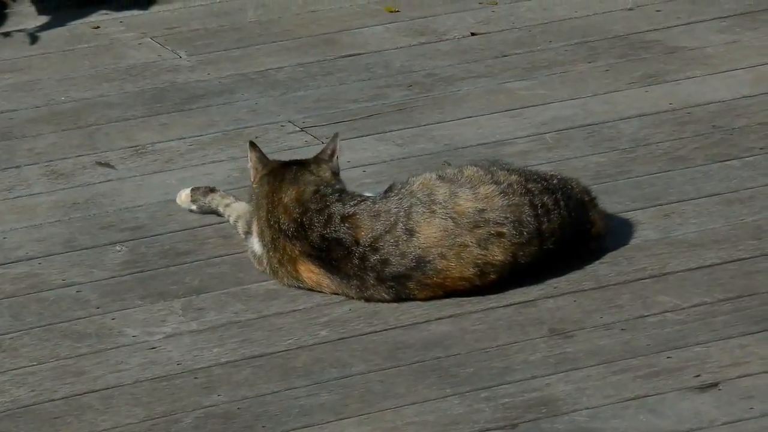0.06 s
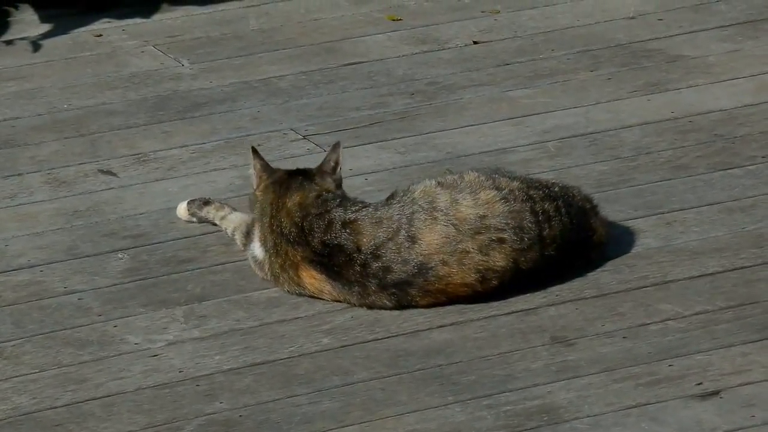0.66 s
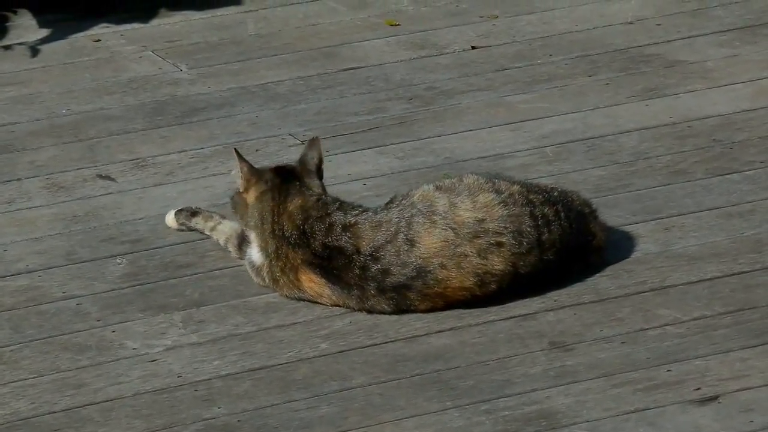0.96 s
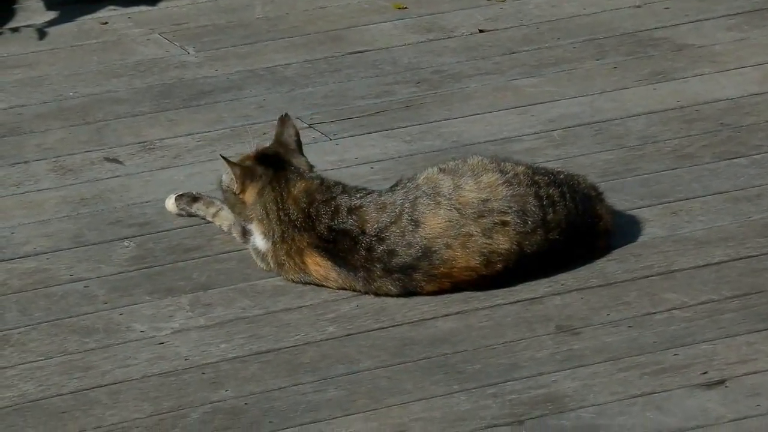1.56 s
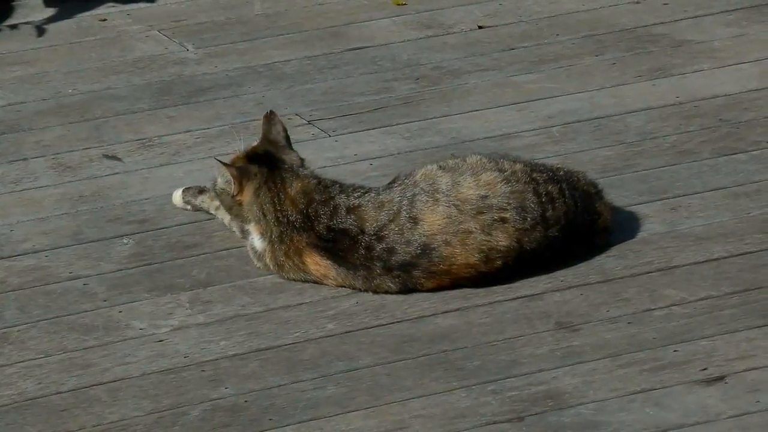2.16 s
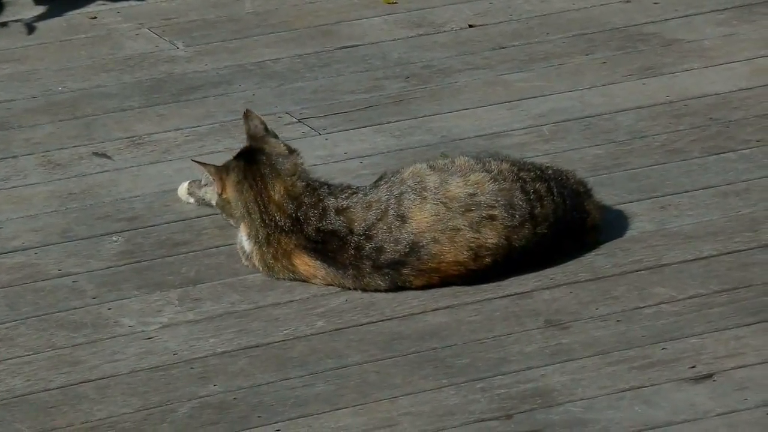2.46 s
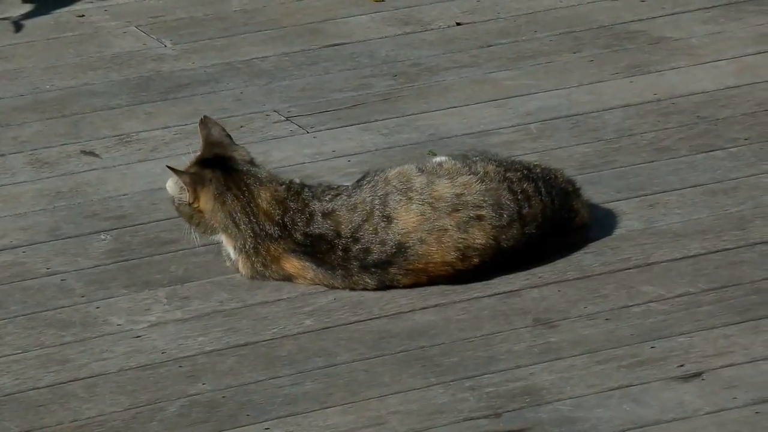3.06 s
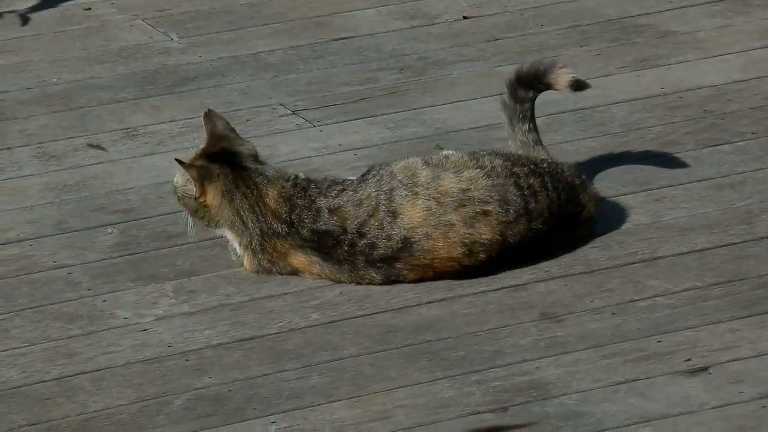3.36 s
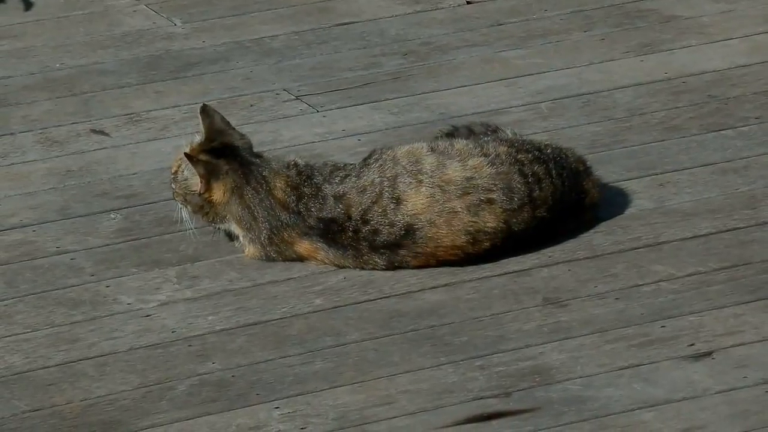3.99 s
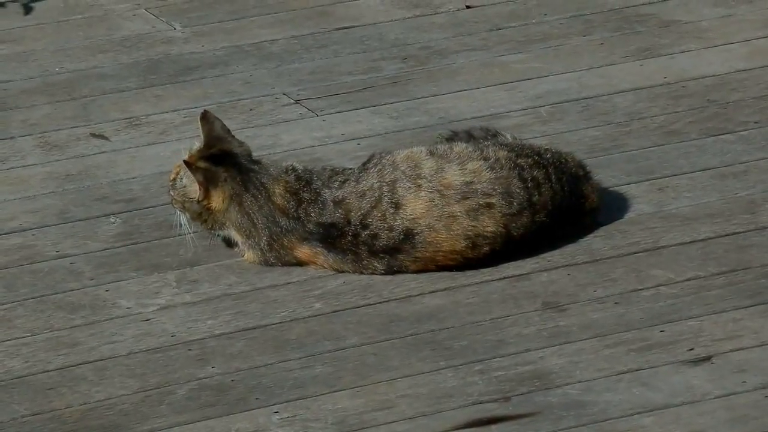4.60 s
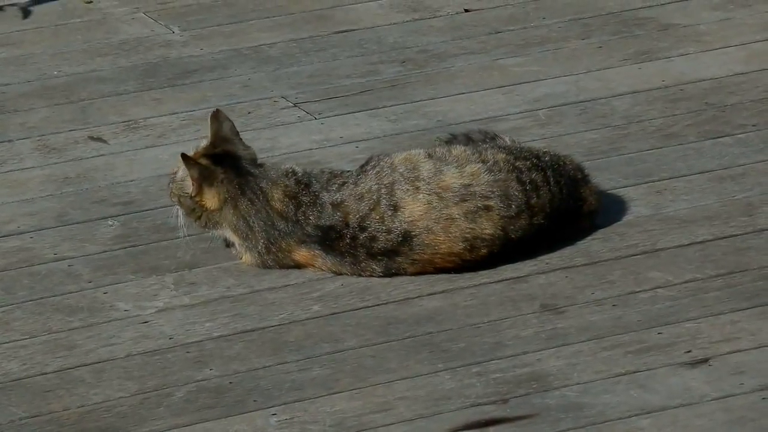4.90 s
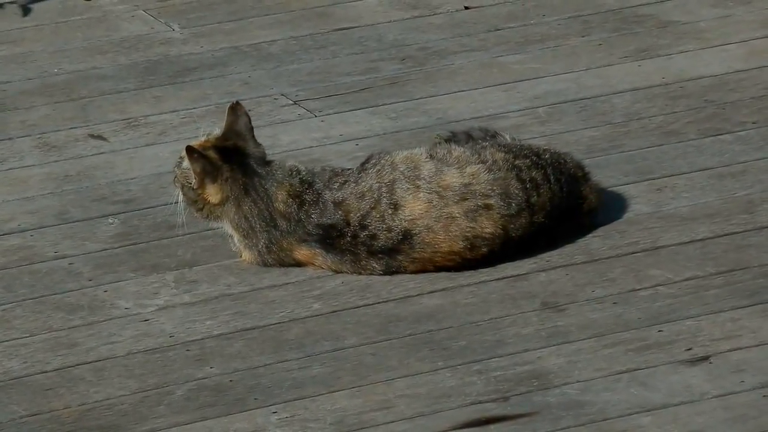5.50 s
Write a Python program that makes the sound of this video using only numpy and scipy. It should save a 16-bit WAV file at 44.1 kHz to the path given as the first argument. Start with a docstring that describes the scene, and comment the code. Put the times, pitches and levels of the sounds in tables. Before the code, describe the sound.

Sandals tap and thud irregularly on wooden boards outdoors, with faint bird chirps and a steady low rumble behind.

```python
"""Sandals on a wooden deck

A few uneven steps: the soles scuff and slap, grit clicks, each impact sets the boards and joists
ringing, and house walls reflect the slaps. To the left a small bird repeats a falling, warbled chirp;
others whistle faintly far away, their calls scattered by trees. Behind it all lie a low distant
rumble, a machine's hum and the microphone's hiss."""
import sys
import numpy as np
from scipy import signal
from scipy.fft import rfft, irfft, next_fast_len
from scipy.io import wavfile
from scipy.ndimage import map_coordinates

SR = 44100
rng = np.random.default_rng(int(sys.argv[2]) if len(sys.argv) > 2 else 0)


def materialize(psi):
    """Save the field psi as 16-bit PCM at rate SR to the path in sys.argv[1].

    A 1-D psi becomes a single channel; in a 2-D psi each row is a channel.
    """
    bounded = np.clip(np.atleast_2d(psi).T, -1, 1)
    quanta = np.round(bounded * 32767).astype(np.int16)
    wavfile.write(sys.argv[1], SR, quanta)


N = 244297

# Spectral densities of the noises: frequency_hz, relative_db
RUMBLE_SPECTRUM = [(12, -10), (20, -4), (43, -2.5), (90, -4), (112, -15), (173, -7.5), (293, -17.5),
                   (332, -18.5), (427, -23.5), (474, -23), (561, -29), (721, -30.5), (967, -39),
                   (2480, -52), (3000, -59.5), (3900, -72), (6600, -120)]
HISS_SPECTRUM = [(1000, -29), (2500, -30), (3800, -18), (5200, -11.5), (7000, -4.5), (9000, -2),
                 (12000, 1.5), (16000, 0.5)]
GRIT_SPECTRUM = [(1000, -17), (3500, -7), (6000, 8), (8000, 16.5), (10500, 5), (15000, -8)]
JOIST_SPECTRUM = [(70, -6.5), (130, 0.5), (190, -1), (330, -3.5), (600, -33.5), (1500, -45)]
SCUFF_SPECTRUM = [(500, -8), (2000, -5), (3200, -10), (6500, 0), (9000, -4), (15000, -16)]
SLAP_SPECTRUM = [(150, -58), (600, 3), (1200, -4), (1700, -3), (2300, -2), (3200, -9), (4600, -5),
                 (5600, -2.5), (7200, 3.5), (8800, -1.5), (11000, -8.5), (13000, -16), (16000, -25)]
# Likeness of the rumble in the two channels: frequency_hz, correlation
RUMBLE_CORRELATION = [(60, 0.98), (130, 0.97), (290, 0.9), (640, 0.65), (1410, 0.14), (3100, 0),
                      (6820, 0.6), (15000, -0.02)]
# Reverberation times of trees and house walls: frequency_hz, t60_s
TREE_DECAY = [(2000, 0.28), (7000, 0.45)]
WALL_DECAY = [(200, 0.19), (1500, 0.2), (7000, 0.19), (15000, 0.17)]
# Calls of the far birds: centre_s, pitch_hz, swell_s, level_db, quaver_fraction
FAR_CALLS = [(.34, 4550, 0.096, -75, .1), (2.61, 3290, 0.087, -75, 0.12), (4.5, 3010, 0.11, -76.5, 0.0336),
             (4.48, 3790, 0.035, -77, 0.072), (4.66, 4500, 0.049, -77, 0.071),
             (4.68, 3880, 0.016, -73, .05), (4.77, 3920, 0.012, -75, .06), (4.82, 2880, 0.077, -80, 0.0277)]
# Chirps of the near bird: start_s, level_db, gain_before_break_db
NEAR_CHIRPS = [(.722, -55, -8), (2.027, -54, 0.5), (2.958, -51.5, 0), (3.899, -53, 0), (4.092, -67.5, -2)]
# A chirp slides down, breaks, flicks up and falls again: elapsed_s, pitch_hz, relative_db
CHIRP_CONTOUR = [(0, 4700, -40), (.025, 4420, -21), (.052, 4080, -13), (.07, 4083, -4), (.083, 3864, -1.5),
                 (.09, 2988, -20), (.096, 3210, -3.5), (.105, 3850, -3), (.114, 3200, -2.5),
                 (.125, 2844, -9.5), (.14, 2650, -29)]
# Clicks of grit: start_s, level_db, t60_s
GRIT_CLICKS = [(1.805, -62.5, 0.082), (3.76, -50, 0.0075), (3.7638, -40.5, 0.0093)]
# Low board modes, and the higher ones a hard heel excites: frequency_hz, bandwidth_hz, relative_db
THUD_MODES = [(178.6, 26, 0.5), (237.4, 37.7, 2.5), (338.6, 50, -2)]
KNOCK_MODES = [(440, 76, 0), (565, 99, -1.5), (694, 102, -3), (827, 115, -4.5), (950, 190, -10)]
# Loads on the deck: start_s, thud_db, knock_db, joist_db, rise_s, hold_s, cutoff_hz
FOOTFALLS = [(0.7824, -38.5, -46, -41.5, .003, 0.016, 810), (1.1962, -38, -45, -43, .002, 0.012, 1600),
             (1.658, -43, -48, -45.5, .005, .01, 1240), (3.0134, -50, -56, -52.5, 0.0044, 0.011, 905),
             (3.429, -35.5, -43.5, -37.5, .002, 0.018, 1190), (5.014, -28, -35.5, -33, 0.006, .026, 910),
             (5.413, -35, -45, -35.5, 0.0046, 0.0081, 423), (5.442, -35, -54, -47, 0.0041, 0.012, 420)]
# Drags of a sole: peak_s, level_db, swell_s
SOLE_DRAGS = [(1.654, -57, 0.015), (3.008, -63.5, 0.022), (5.011, -46.5, 0.017), (5.44, -63, 0.042)]
# Contacts of a sole, several for a rolling foot: start_s, level_db, tilt_db_per_octave
SOLE_CONTACTS = [(0.7829, -35, 0), (1.1964, -36, .7), (1.66, -39, 2.5), (1.666, -39.5, 2.5),
                 (3.0133, -45.5, -1), (3.021, -49.5, -1.5), (3.4288, -33, 0), (3.436, -39.5, 11),
                 (5.013, -32, -3), (5.0182, -26.5, 0.5), (5.027, -35, 4)]
# Level difference of the steps between the channels: frequency_hz, left_minus_right_db
STEP_BALANCE = [(500, .5), (1500, 1.5), (3000, 3), (5000, 8), (6300, 4), (7800, -1.5), (10500, -8),
                (15000, -4)]

WARBLE_HZ, WARBLE_DEPTH, RASP_DEPTH, CHIRP_BREAK_S = 150, 0.06, 0.068, 0.09
UPPER_RATIO, UPPER_DB, UPPER_PEAK_S, UPPER_SWELL_S = 1.36, -17.5, 0.044, 0.032  # the bird's second voice
THUD_T60_S, KNOCK_T60_S, JOIST_T60_S = 0.24, 0.25, 0.63
SLAP_HOLD_S, SLAP_T60_S = 0.0019, 0.016  # a slap holds while the sole flattens, then dies at once
SCATTER_DB, SCATTER_T60_S = -8, 0.053
TOP_HZ = 15850


def amp(db):
    """Amplitude ratio of a level in decibels."""
    return 10 ** (np.asarray(db) / 20)


def unit(x):
    """Normalisation to an rms of 1."""
    return x / np.sqrt(np.mean(x ** 2) + 1e-20)


def along(points, hz):
    """Interpolation of (frequency_hz, value) points on a logarithmic frequency axis."""
    frequencies, values = np.transpose(points)
    return np.interp(np.log(hz + 1), np.log(frequencies + 1), values)


def since(start_s):
    """Seconds elapsed since start_s, for every sample."""
    return np.arange(N) / SR - start_s


def fade(t, t60):
    """Exponential decay from t = 0, falling 60 dB in t60."""
    return (t >= 0) * np.exp(-np.log(1000) * np.abs(t) / t60)


def held(t, hold, t60):
    """A plateau from t = 0 for hold seconds, then exponential decay."""
    return (t >= 0) * fade(np.maximum(t - hold, 0), t60)


def swell(t, width):
    """A Gaussian envelope around t = 0, down to 1/e at t = width."""
    return np.exp(-(t / width) ** 2)


def wobble(rate):
    """Smooth random modulation with rate knots a second."""
    return map_coordinates(rng.standard_normal(int(N * rate / SR) + 4), [np.arange(N) * rate / SR])


def filtered(x, response):
    """Linear filtering: the spectrum of x times a complex frequency response."""
    n = x.shape[-1]
    padded = next_fast_len(n + SR // 10, real=True)
    return irfft(rfft(x, padded) * response(np.fft.rfftfreq(padded, 1 / SR)), padded)[..., :n]


def noise(spectrum, channels=1):
    """Coloured Gaussian noise of rms 1."""
    return unit(filtered(rng.standard_normal((channels, N)), lambda hz: amp(along(spectrum, hz))))


def burst(carrier, envelope):
    """Amplitude modulation, scaled to the energy of the envelope."""
    return unit(carrier * envelope) * np.sqrt(np.mean(envelope ** 2))


def reverberation(x, decay, correlation, delay_s):
    """Convolution with a diffuse stereo tail of unit energy; each frequency decays at its own rate."""
    hz, t, spectra = signal.stft(rng.standard_normal((2, SR // 2)), SR, nperseg=256)
    mid, side = signal.istft(spectra * fade(t, along(decay, hz)[:, None]), SR)[1]
    side = side * np.tan(np.arccos(np.clip(correlation, 0, 1)) / 2)
    tail = np.array([mid + side, mid - side]) * (np.arange(len(mid)) / SR > delay_s)
    return signal.fftconvolve(np.atleast_2d(x), tail / np.linalg.norm(tail[0]), axes=1)[:, :N]


def background():
    """Superposition of partly coherent far rumble, a wavering machine tone and microphone self-noise."""
    def mid_side_gains(hz):
        angle = np.arccos(np.clip(along(RUMBLE_CORRELATION, hz), -1, 1)) / 2
        return np.array([np.cos(angle), np.sin(angle)])
    mid, side = filtered(noise(RUMBLE_SPECTRUM, channels=2), mid_side_gains)
    rumble = amp(-45.5 + 0.62 * wobble(3.18)) * unit(np.array([mid + side, mid - side]))
    hum = amp(-56 + 1.6 * wobble(0.86)) * unit(np.sin(2 * np.pi * 53.8 * since(0) + 0.24 * wobble(3.2)))
    hiss = amp(-62) * noise(HISS_SPECTRUM, channels=2)
    return rumble + hum + hiss


def far_birds():
    """Scattering: faint, quavering tones arrive only by way of the trees, with no direct sound."""
    song = np.zeros(N)
    for centre_s, pitch_hz, swell_s, level_db, quaver in FAR_CALLS:
        phase = 2 * np.pi * np.cumsum(pitch_hz * (1 + quaver * wobble(430))) / SR
        song += amp(level_db) * swell(since(centre_s), swell_s) * np.sin(phase)
    return reverberation(song, TREE_DECAY, correlation=0.33, delay_s=0.0024)


def near_bird():
    """Frequency modulation gives a falling, two-voiced chirp its raspy warble; the trees smear it."""
    song = np.zeros(N)
    elapsed_s, pitch_hz, contour_db = np.transpose(CHIRP_CONTOUR)
    warble = WARBLE_DEPTH * np.sin(2 * np.pi * WARBLE_HZ * since(0) + wobble(40))
    rasp = RASP_DEPTH * wobble(1500)
    flutter_db = 2.6 * wobble(250)
    for start_s, level_db, opening_db in NEAR_CHIRPS:
        t = since(start_s)
        phase = 2 * np.pi * np.cumsum(np.interp(t, elapsed_s, pitch_hz) * (1 + warble + rasp)) / SR
        envelope = amp(np.interp(t, elapsed_s, contour_db) + flutter_db) * (t > 0) * (t < elapsed_s[-1])
        lower = envelope * (np.sin(phase) + amp(-15.5) * np.sin(2 * phase))
        upper = amp(UPPER_DB) * swell(t - UPPER_PEAK_S, UPPER_SWELL_S) * np.sin(UPPER_RATIO * phase)
        song += amp(level_db + opening_db * (t < CHIRP_BREAK_S)) * (lower + upper)
    trees = reverberation(song, TREE_DECAY, correlation=0.036, delay_s=0.0013)
    return song * amp([[1.5], [-4]]) + trees * amp([[1], [-1]])  # louder on the left


def grit():
    """Brief contacts of grit on the boards radiate bright clicks, which the walls reflect."""
    envelope = sum(amp(level_db) * fade(since(start_s), t60) for start_s, level_db, t60 in GRIT_CLICKS)
    clicks = noise(GRIT_SPECTRUM) * envelope
    return clicks + amp(-1) * reverberation(clicks, WALL_DECAY, correlation=0.23, delay_s=0.0034)


def modal_noise(modes):
    """Modal superposition: two independent noises pass through resonances of alternating sign."""
    def response(hz):
        return sum((-1) ** k * amp(db) * 1j * hz * width / (centre ** 2 - hz ** 2 + 1j * hz * width)
                   for k, (centre, width, db) in enumerate(modes))
    return filtered(rng.standard_normal((2, N)), response)


def deck():
    """Damped vibration: each step shakes boards and joists, ringing both the low and the higher board modes at
    levels set for each step."""
    thud, knock, joists = modal_noise(THUD_MODES), modal_noise(KNOCK_MODES), noise(JOIST_SPECTRUM)
    out = np.zeros((2, N))
    for start_s, thud_db, knock_db, joist_db, rise_s, hold_s, cutoff_hz in FOOTFALLS:
        t = since(start_s)
        lowpass = signal.butter(3, cutoff_hz, fs=SR, output="sos")
        onset = 1 - np.exp(-np.maximum(t, 0) / rise_s)
        for ringing, level_db, t60, side_db in [(thud, thud_db, THUD_T60_S, -18.5),
                                                (knock, knock_db, KNOCK_T60_S, -13.5)]:
            mid, side = signal.sosfilt(lowpass, ringing)
            envelope = amp(level_db) * onset * held(t, hold_s, t60)
            out += burst(mid, envelope) + amp(side_db) * burst(side, envelope) * [[1], [-1]]
        out += burst(joists, amp(joist_db) * onset * fade(t, JOIST_T60_S))
    return out


def scuffs():
    """Sliding friction: broadband noise swells and fades as a sole brushes the wood."""
    envelope = sum(amp(level_db) * swell(since(peak_s), width) for peak_s, level_db, width in SOLE_DRAGS)
    return noise(SCUFF_SPECTRUM, channels=2) * envelope


def slaps():
    """Impact noise of the soles, scattered by railings and furniture and reflected by the walls."""
    out = np.zeros((2, N))
    length, lead = SR // 3, 100  # samples
    t = (np.arange(length) - lead) / SR
    for start_s, level_db, tilt in SOLE_CONTACTS:
        colour = lambda hz: amp(along(SLAP_SPECTRUM, hz) + tilt * np.log2((hz + 500) / 6000))
        carriers = filtered(rng.standard_normal((3, length)), colour)
        envelope = amp(level_db) * held(t, SLAP_HOLD_S, SLAP_T60_S)
        direct = burst(carriers[0], envelope)
        scatter = burst(carriers[1:], amp(level_db + SCATTER_DB) * fade(t, SCATTER_T60_S))
        # A pulse of the slap's colour draws a smooth wash from the walls, new for each spot.
        pulse = unit(filtered(signal.unit_impulse(length, lead), colour)) * np.sqrt(np.mean(envelope ** 2))
        walls = reverberation(pulse, WALL_DECAY, correlation=0.063, delay_s=0.0023)[:, :length]
        first = int(start_s * SR) - lead
        out[:, first:first + length] += amp(-5.5) * direct + scatter + amp(-3) * walls
    return out


def scene():
    """The sources add linearly; a level difference between the channels sets the steps off centre."""
    steps = scuffs() + slaps() + grit() + deck()
    steps = filtered(steps, lambda hz: amp(along(STEP_BALANCE, hz) * np.array([[0.5], [-0.5]])))
    return steps + near_bird() + far_birds() + background() * amp([[0.25], [-0.25]])


def record(dry):
    """Band limiting: an ideal low-pass filter removes everything above TOP_HZ."""
    return filtered(dry, lambda hz: hz < TOP_HZ)


dry = scene()
out = record(dry)
materialize(out)
```